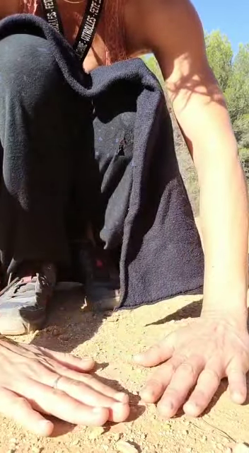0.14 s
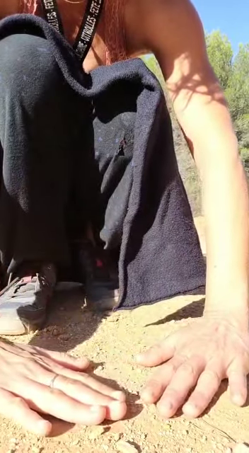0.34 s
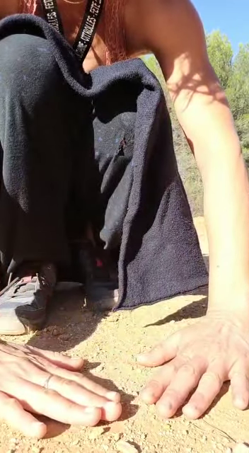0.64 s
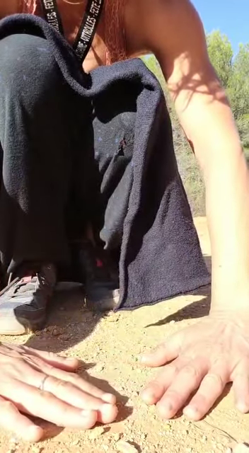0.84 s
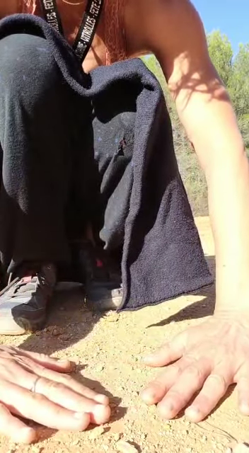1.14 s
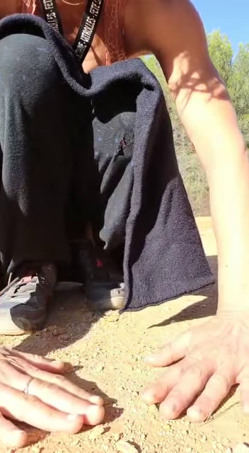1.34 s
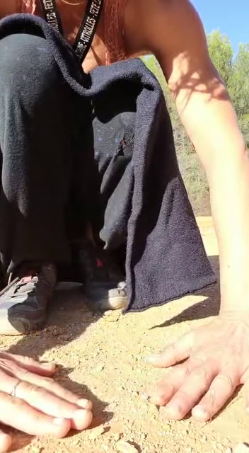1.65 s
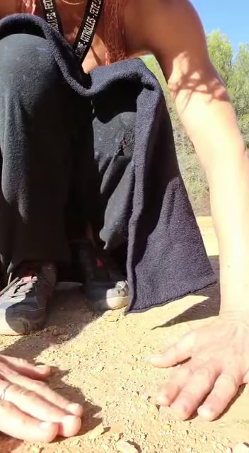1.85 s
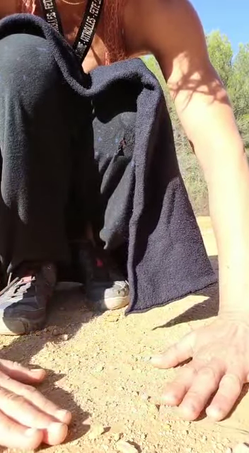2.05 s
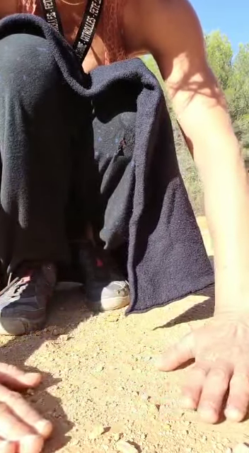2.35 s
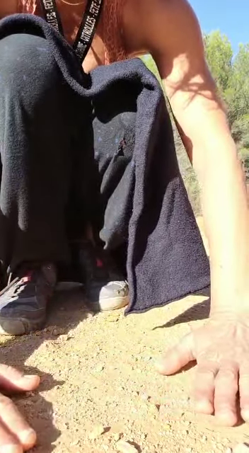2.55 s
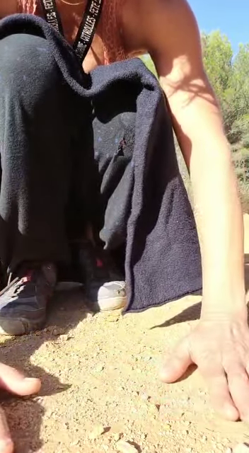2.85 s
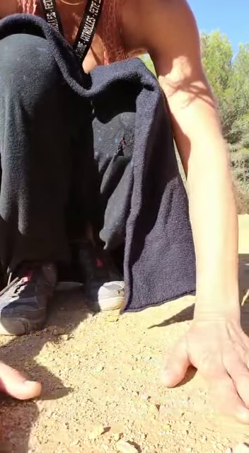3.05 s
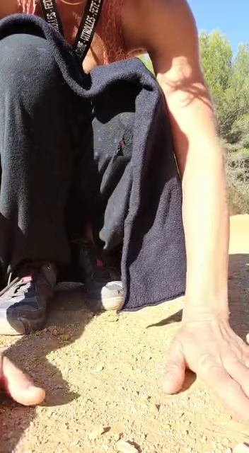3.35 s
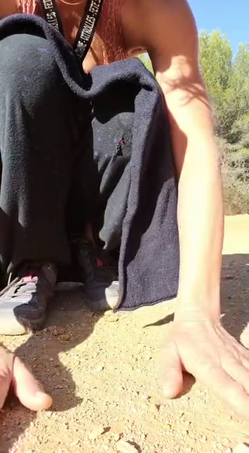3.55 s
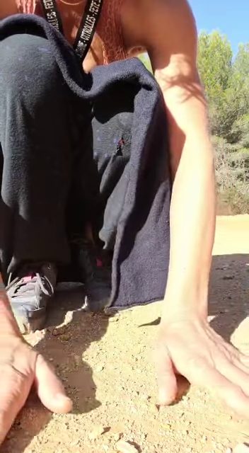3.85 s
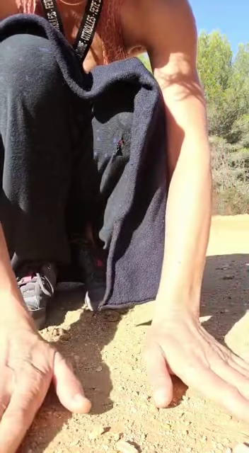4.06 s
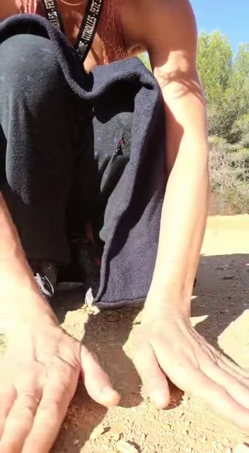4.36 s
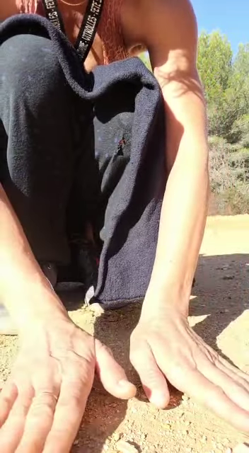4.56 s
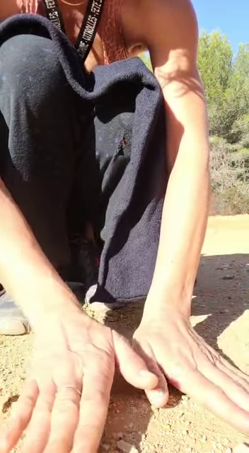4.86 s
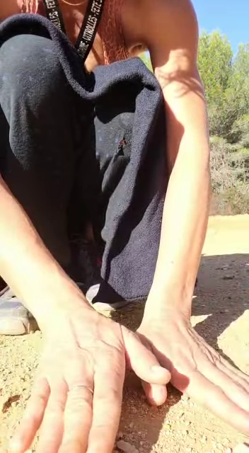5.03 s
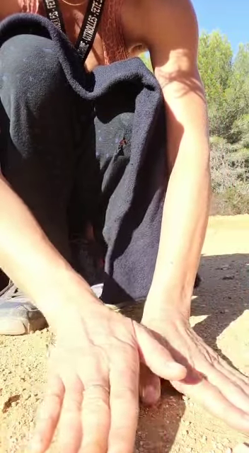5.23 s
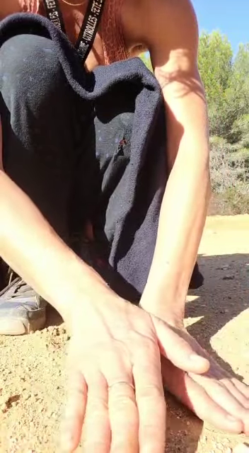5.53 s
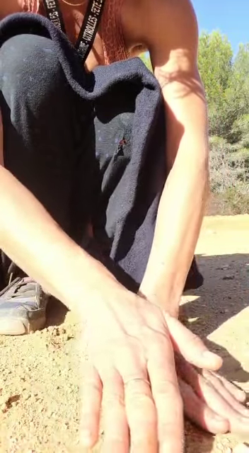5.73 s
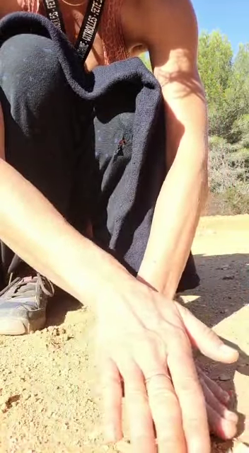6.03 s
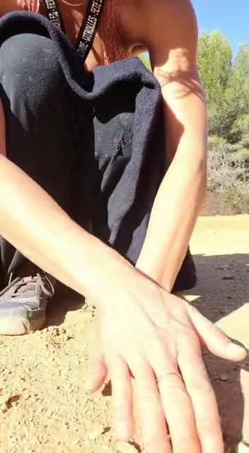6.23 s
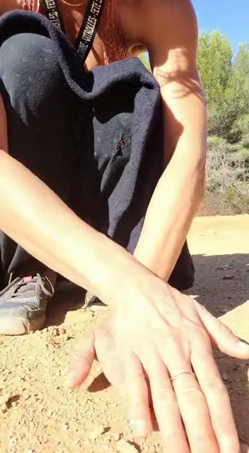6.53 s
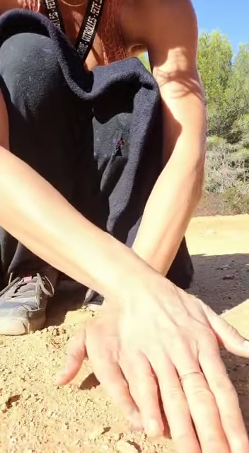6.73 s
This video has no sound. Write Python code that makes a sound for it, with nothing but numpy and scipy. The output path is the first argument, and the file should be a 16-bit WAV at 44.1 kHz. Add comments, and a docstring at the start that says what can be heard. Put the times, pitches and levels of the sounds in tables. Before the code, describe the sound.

Bare palms slide slowly over dry gravelly soil, grit crunching and small stones clicking, with soft low wind buffeting the microphone.

```python
"""On dry gravelly soil, just in front of a phone lying on the ground, two palms slide slowly.
Grit crunches as swarms of damped sines that stick and slip together; stones ring and thud;
grains crack with a bright fizz, and the heel of a palm thumps. Wind is coloured noise: soft
buffets, a low drone and a far hiss. The two ports filter all but the buffets, and the right
one mostly hears the ground first."""
import sys
import numpy as np
from scipy import signal
from scipy.fft import rfft, irfft, next_fast_len
from scipy.io import wavfile
from scipy.ndimage import uniform_filter1d, map_coordinates

SR = 44100
rng = np.random.default_rng(int(sys.argv[2]) if len(sys.argv) > 2 else 0)


def generate_wav(sig):
    """Save sig (samples, or channels by samples) to the path in sys.argv[1] as 16-bit PCM at SR."""
    pcm = np.round(np.clip(np.atleast_2d(sig).T, -1, 1) * 32767).astype(np.int16)
    wavfile.write(sys.argv[1], SR, pcm)


def decibels_to_gain(level_db):
    """Convert a level in decibels to a linear amplitude gain (20 dB per decade)."""
    exponent = np.asarray(level_db, float) / 20
    return 10 ** exponent


N = 303849

# Wind levels before random swaying: start_s, buffet_db, drone_db
WIND_LEVELS = [(0.0, -48, -52.5), (1.15, -47.5, -54.5), (1.48, -44.5, -53.5), (2.01, -49, -54.5),
               (2.09, -44, -53), (2.8, -48, -53.5), (2.99, -47, -48.5), (3.03, -49, -52),
               (3.34, -43, -51.5), (5.05, -47.5, -54), (5.08, -43, -55.5), (5.16, -55, -53),
               (5.31, -43, -54), (5.47, -47.5, -57), (5.82, -43, -52.5), (5.85, -47.5, -56),
               (6.75, -46.5, -53), (6.89, -43.5, -56)]
# Spectral shape of the buffets: frequency_hz, density_db
BUFFET_SPECTRUM = [(8.8, -16), (16, 1.5), (30, -5), (70, -17), (120, -23.5), (160, -36), (260, -120)]
# Spectral shape of the drone ahead of the ports: frequency_hz, density_db
DRONE_SPECTRUM = [(41, -31), (70, -10), (156, -2), (220, -2.5), (312, -5.5), (404, -10.5), (646, -32),
                  (900, -23), (1170, -77), (1980, -120)]
# Left-right correlation of the drone ahead of the ports: frequency_hz, likeness (0-1)
DRONE_LIKENESS = [(60, .985), (130, .98), (200, .92), (290, .72), (500, .2), (900, .1)]
# Far hiss ahead of the ports, against white noise of rms 1: frequency_hz, level_db
AIR_SPECTRUM = [(200, -90), (600, -53), (1400, -57.5), (2000, -59.5), (2500, -57.5), (3200, -60),
                (4500, -56), (6600, -54), (8500, -56.5), (14000, -52)]
# Peaks and notches of the two microphone ports: frequency_hz, left_db, right_db
PORT_RESPONSE = [(80, 0, 0), (200, -2.5, 0), (400, -5, 0), (900, -14.5, -3.5), (1450, -6.5, 0),
                 (1640, -9, -.5), (1820, -4, 0), (1990, -10, 1), (2250, -18.5, -12), (2450, -17, -12.5),
                 (2800, -20.5, -14.5), (3200, -17.5, -11), (3650, -18, -14.5), (4200, -20.5, -21.5),
                 (5150, -15, -12), (5450, -17.5, -11), (5950, -33, -35), (6200, -33, -36),
                 (6550, -18.5, -14), (7000, -20.5, -20.5), (7900, -31, -31), (8900, -31, -28),
                 (9300, -39, -34), (9750, -42, -38), (10050, -35, -27), (11000, -49, -42.5),
                 (11700, -55, -53.5), (12500, -56, -55.5), (13900, -38.5, -33), (14400, -48.5, -43),
                 (15100, -41, -37.5), (16200, -58, -56)]
# Mean delay of the left port behind the right for the hands: start_s, lag_s
PORT_LAG = [(0, 0.00038), (3.5, 0.00045), (4.6, 0.000471), (6.89, 0.00061)]

# Palm heel bumping the ground, ahead of filtering: start_s, level_db, pitch_hz
THUMP_EVENTS = [(2.831, -35, 280), (2.902, -35, 190), (2.912, -35, 200), (2.925, -31, 140),
                (2.987, -27.5, 230), (3.148, -36, 300)]
# Larger grains that crack, nominal, ahead of the ports: start_s, level_db, pitch_hz, fizz_over_snap_db
CRACK_EVENTS = [(0.1739, -39, 5380, 17), (0.3748, -34, 3170, 18.5), (0.4971, -42.5, 2760, 20),
                (0.5424, -35.5, 3180, 18), (0.6037, -39.5, 3040, 10), (0.77, -43, 2845, 17),
                (1.0503, -34, 5700, 10), (1.3583, -38, 5500, 7), (1.3762, -22.5, 5630, 3),
                (1.6141, -32, 3300, 14), (1.8278, -36, 5400, -4), (1.8384, -38, 5200, -4),
                (1.9038, -50, 3200, 1), (1.918, -37, 2960, 4), (1.924, -32, 5300, 4), (1.936, -36, 5300, 1),
                (1.942, -32, 4120, 4), (1.954, -32, 5300, 2), (1.9689, -25, 5200, 13), (2.02, -40, 5300, 1),
                (2.0442, -30, 3030, 6), (2.0851, -19.5, 5400, 8), (2.094, -37, 4800, 4),
                (2.1232, -22.5, 4940, 8), (2.266, -31, 5300, 4), (2.2731, -27, 5640, 4),
                (2.333, -30, 3350, 9), (2.3463, -24.5, 5700, 2), (2.4461, -22.5, 5030, 13),
                (2.5164, -30, 4990, -2), (2.5444, -35, 5050, 0), (2.562, -45, 5100, 4),
                (2.594, -29, 5500, 8), (2.619, -30.5, 5000, 18), (2.647, -47, 5000, 2),
                (2.691, -39, 5000, 16), (2.7187, -25, 5440, 4), (2.724, -27.5, 2800, 16.5),
                (2.741, -35, 3300, 18), (2.7804, -20, 4950, 14), (2.831, -22.5, 3220, 12),
                (2.8514, -31, 3160, 17), (2.865, -44, 5300, 6), (2.8817, -38, 3210, 5),
                (2.9022, -24.5, 3560, 12), (2.914, -25.5, 3500, 13), (2.9247, -23, 3630, 11),
                (2.9888, -19, 3430, 11.5), (3.002, -33, 3400, 12), (3.2838, -36.5, 2920, 13),
                (3.312, -36, 3050, 20), (3.5679, -39, 3300, 1), (3.7266, -32, 3000, 12.5),
                (3.7684, -39, 3000, 20), (3.8185, -34, 5350, 2), (3.9181, -37, 2950, 21),
                (4.0374, -31.5, 3370, 13), (4.241, -26.5, 5500, 8), (4.413, -34, 5430, 11),
                (4.4653, -25, 6000, 3), (4.4881, -27, 5540, 6), (4.5377, -32, 5370, 13),
                (4.5599, -20, 5950, 7), (4.6954, -39, 5140, 20), (4.8597, -35, 5640, -15),
                (5.178, -44.5, 5540, -3), (5.468, -54, 5400, 31), (5.7406, -39.5, 2840, 18),
                (5.8362, -19, 5730, 1), (5.871, -30, 3740, 12), (5.9057, -44, 5340, 4),
                (6.0108, -19.5, 5300, 1), (6.0888, -27, 4100, 6), (6.1105, -31, 5800, -3),
                (6.131, -47, 5300, 4), (6.168, -50, 5280, 2), (6.191, -38, 3950, 8), (6.1985, -24, 4290, 9),
                (6.3353, -36.5, 3670, 11), (6.4923, -40, 3360, 18), (6.5261, -42, 3650, 25),
                (6.6361, -29.5, 3090, 17)]
# Larger stones that roll over, nominal, ahead of the ports: start_s, level_db, pitch_hz, thud_over_ring_db
STONE_EVENTS = [(0.038, -34, 2020, -13), (0.116, -38, 1980, 6), (0.145, -39.5, 1540, -8),
                (0.175, -37, 1100, -3), (0.198, -37, 1940, -18), (0.247, -46, 1860, 1),
                (0.291, -54, 1900, -15), (0.35, -38, 1900, 2.5), (0.374, -39, 1720, -1),
                (0.388, -29.5, 1140, -12), (0.42, -43, 1380, -4), (0.499, -32.5, 1960, -12),
                (0.501, -34, 1250, -19), (0.542, -30.5, 1720, -5.5), (0.547, -33.5, 1900, -2),
                (0.605, -35.5, 1190, -18), (0.728, -40, 1940, 0), (0.742, -35, 1170, -13),
                (0.77, -33, 1230, -29), (0.789, -31, 1114, -30), (0.806, -36, 1700, -7),
                (0.934, -33.5, 1010, -17), (1.036, -34.5, 1160, -5), (1.068, -51, 1290, -15),
                (1.096, -38.5, 1110, -6), (1.13, -57, 1200, -14), (1.208, -38.5, 800, 1),
                (1.237, -38, 1130, -3.5), (1.359, -44.5, 1900, 4), (1.411, -41, 2000, -14),
                (1.435, -43, 1830, -12), (1.512, -33.5, 1030, -22), (1.539, -39, 1000, -20),
                (1.636, -38, 1820, -16), (1.92, -37, 2100, -12), (1.943, -30, 1040, -29),
                (1.969, -28, 2030, -26), (2.018, -42, 923, -16), (2.046, -42, 1800, -11),
                (2.076, -38, 2040, -25), (2.095, -42, 1800, -20), (2.125, -40, 2000, -17),
                (2.193, -36, 1090, -11), (2.21, -34, 1110, -13), (2.235, -36, 1640, -16),
                (2.423, -33.5, 1070, -25), (2.445, -35, 1880, -22), (2.455, -31.5, 2080, -24),
                (2.56, -33, 1380, -24), (2.609, -26.5, 1920, -22), (2.637, -41, 1850, -20),
                (2.665, -53, 1930, -20), (2.689, -36, 1900, -20), (2.703, -31, 1880, -20),
                (2.718, -36, 1920, -24), (2.726, -31, 2000, -15), (2.741, -37, 2000, -18),
                (2.77, -39, 2000, -20), (2.782, -28, 1960, -25), (2.81, -28.5, 1960, -17),
                (2.831, -29, 2000, -20), (2.851, -39, 1930, -16), (2.882, -43, 1880, -20),
                (2.902, -49, 1850, -15), (2.913, -40, 1860, -22), (2.926, -39, 1900, -15),
                (2.975, -34, 1870, -21), (2.986, -26, 1970, -23), (3.002, -44, 1910, -22),
                (3.136, -34, 2220, -9), (3.268, -41, 2080, -14), (3.287, -34, 2220, -20),
                (3.304, -40, 1500, -20), (3.312, -42, 1890, -23), (3.506, -39, 2000, -20),
                (3.729, -32.5, 2040, -26), (3.756, -34, 1980, -19), (3.87, -32, 2100, -13),
                (3.918, -25, 1950, -18), (4.039, -42, 2000, -1), (4.17, -36, 1980, -13),
                (4.242, -41.5, 1910, -14), (4.316, -41, 1840, -7), (4.386, -41, 1890, -19),
                (4.398, -37.5, 1830, -32), (4.448, -35.5, 1850, -25), (4.536, -32, 1830, -19),
                (4.562, -29, 1860, -24), (4.695, -35.5, 1950, -2), (4.715, -35.5, 2020, -24),
                (4.765, -44, 1960, -20), (4.807, -44, 1870, -17), (4.835, -55, 1890, -20),
                (4.86, -42, 1230, -14), (4.903, -47, 1850, -25), (5.125, -50, 1500, -25),
                (5.285, -52.5, 1930, -25), (5.405, -50, 1900, -25), (5.427, -53, 1900, -25),
                (5.468, -39.5, 1970, -32), (5.742, -40, 1290, -21), (5.765, -43, 1950, -19),
                (5.788, -45, 1680, -25), (5.809, -53, 1780, -25), (5.821, -44, 1870, -27),
                (5.838, -32, 1800, -30), (5.845, -32, 1720, -22), (5.867, -40, 1330, -31),
                (5.905, -37.5, 1920, -26), (5.943, -33, 1360, -20), (5.958, -44, 1400, -22),
                (6.011, -33.5, 1630, -5), (6.02, -34, 1140, -12), (6.063, -30, 1060, -30),
                (6.089, -44, 1730, -20), (6.11, -53, 1860, -20), (6.14, -51, 1925, -17),
                (6.192, -38, 1374, -22), (6.201, -34, 1460, -19), (6.241, -43, 1270, -20),
                (6.41, -46, 1340, -19), (6.44, -43, 1430, -19), (6.493, -38.5, 1670, -30),
                (6.46, -45, 1310, -20), (6.527, -30.5, 1590, -9), (6.534, -33, 1610, -15),
                (6.544, -36, 1574, -1), (6.564, -33, 1600, -12), (6.579, -42, 1790, -14),
                (6.606, -34, 974, -15), (6.613, -33, 1760, -14), (6.637, -29, 1630, -27),
                (6.657, -37, 1700, -18.5), (6.675, -47, 1510, -15), (6.703, -37.5, 2030, -14),
                (6.821, -48.5, 1900, -14), (6.871, -45, 1680, -24)]
# Sliding palms, levels before the surge: start_s, crunch_db, grind_db (coarse), sand_db (fine), hollow_hz
PALM_STROKE = [(0.0, -57.5, -57, -74.5, 1730), (0.22, -57, -59.5, -77, 1730), (0.36, -58, -60.5, -75, 1670),
               (0.45, -65.5, -64, -79, 1310), (0.7, -68.5, -63, -81.5, 1380), (1.0, -64, -72, -86.5, 1170),
               (1.12, -57, -82, -74.5, 1140), (1.2, -53.5, -66, -73, 1200), (1.32, -62, -77, -76.5, 1300),
               (1.38, -59.5, -69, -66, 1700), (1.52, -59, -75, -67.5, 1050), (1.6, -52, -60, -64, 1510),
               (1.74, -64, -73, -69, 1160), (1.83, -55.5, -65.5, -62.5, 1610),
               (1.98, -60, -60.5, -65, 1460), (2.08, -52, -71, -61, 1150), (2.22, -56, -59, -65, 1200),
               (2.36, -62.5, -62.5, -67, 1640), (2.44, -55.5, -55.5, -62.5, 1820),
               (2.6, -57.5, -65, -66.5, 1850), (2.76, -57.5, -64, -67, 1940), (2.98, -59, -63, -72, 1760),
               (3.04, -58.5, -59.5, -77.5, 1940), (3.24, -56, -54.5, -76, 1960),
               (3.32, -50.5, -56, -71.5, 1820), (3.5, -53, -54.5, -70, 1600), (3.85, -53, -51, -68, 1870),
               (3.95, -47, -48, -67.5, 2200), (4.12, -54.5, -52.5, -71.5, 1960),
               (4.25, -62.5, -54.5, -73, 1680), (4.44, -54.5, -62, -69.5, 1660),
               (4.55, -67.5, -58, -70, 1810), (4.82, -64.5, -58.5, -71, 1740),
               (4.92, -85.5, -67.5, -82, 1410), (5.34, -89.5, -72, -88.5, 1490),
               (5.48, -61.5, -78, -75, 1870), (5.6, -68, -83, -77, 1320), (5.78, -63, -85, -76, 1380),
               (5.84, -50.5, -77, -60, 1600), (5.9, -52.5, -81, -66, 1260), (5.995, -59, -62, -67.5, 1420),
               (6.015, -49, -63, -62.5, 1300), (6.045, -54, -54, -68, 1150), (6.07, -48.5, -61, -63, 1160),
               (6.14, -60.5, -71, -69, 1370), (6.3, -73.5, -64, -73, 1510), (6.42, -63.5, -79, -77, 1270),
               (6.5, -59.5, -70, -78, 1310), (6.6, -58, -56, -80.5, 1160), (6.66, -53, -56, -78, 1200),
               (6.74, -74, -75, -82.5, 1750), (6.89, -74, -62.5, -83, 1590)]
# Soil under the palms: start_s, rasp_over_blend_db, dust_over_blend_db, jerkiness (0-1.5)
SOIL_TEXTURE = [(0, -0.5, -15.5, 1.09), (1.2, -3.5, -13.5, 1.1), (1.5, -4.5, -26, 1.1),
                (2.4, -1, -22.5, 1.1), (2.95, 3, -14.5, 1.09), (3.15, 8, -12.5, .45), (4.1, 3, -15.5, .45),
                (4.4, -2, -25, .9), (5.5, -18, -29, .9), (5.9, -1.5, -10, 1.1), (6.3, -4.5, -23, 1.1),
                (6.89, 4.5, -11, 1.1)]

RASP_SAND, DUST_SAND = 0.92, 0.52  # share of sand in the blends: rasp of crunch and sand, dust of grind and sand
SURGE_DB, SWAY_DB = 1.1, 4  # scales of the uneven push (per jerkiness) and of the left-right sway
RING_DECAY_S = 0.0013  # nominal time for a stone's ring to fall to 1/e
CREEP, ROLL_KICK = 0.7, 2.2  # steady creep between slips; slip set off by a tabled stone or crack
SLIP_DECAY_S, SLIP_SMOOTH_S = 0.007, 0.005  # fall of a slip to 1/e; span over which it is averaged


def unit(x):
    """Normalization: divides a signal by its root mean square."""
    return x / np.sqrt(np.mean(x ** 2) + 1e-20)


def along(points, hz):
    """Logarithmic frequency scale: interpolates each value column of a spectrum."""
    f, *cols = np.transpose(points)
    return np.array([np.interp(np.log(hz + 1), np.log(f + 1), c) for c in cols])


def curves(rows):
    """Piecewise-linear envelopes: one value per sample for each column after the time."""
    s, *cols = np.transpose(rows)
    return [np.interp(np.arange(N) / SR, s, c) for c in cols]


def wobble(rate):
    """Slow random fluctuation: a smooth curve through rate random knots a second."""
    knots = rng.standard_normal(int(N * rate / SR) + 4)
    return map_coordinates(knots, [np.arange(N) * rate / SR])


def sides(pan_db):
    """Interaural-style level difference: splits a left-right difference into two gains."""
    return decibels_to_gain(np.array([pan_db / 2, -pan_db / 2]))


def ported(pair):
    """Linear filtering: each channel passes the causal minimum-phase response of its port."""
    size = 4096
    log_gain = np.log(decibels_to_gain(along(PORT_RESPONSE, np.fft.rfftfreq(size, 1 / SR))))
    # folding the cepstrum onto positive time gives minimum phase
    cepstrum = irfft(log_gain, size)
    cepstrum[:, 1:size // 2] *= 2
    cepstrum[:, size // 2 + 1:] = 0
    response = irfft(np.exp(rfft(cepstrum)), size)[:, :size // 4]
    return signal.oaconvolve(pair, response, axes=-1)[:, :N]


def above(x, edge_hz):
    """Steep high-pass: the grains carry little energy far below their own pitch."""
    return signal.sosfilt(signal.butter(4, edge_hz, "high", fs=SR, output="sos"), x)


def rush(spectrum, alike):
    """Partial coherence: coloured mid and side noises mix to a given left-right likeness."""
    size = next_fast_len(N)
    hz = np.fft.rfftfreq(size, 1 / SR)
    angle = np.arccos(np.clip(along(alike, hz)[0], -1, 1)) / 2
    coloured = rfft(rng.standard_normal((2, size))) * decibels_to_gain(along(spectrum, hz))
    mid, side = irfft(coloured * [np.cos(angle), np.sin(angle)], size)
    return np.array([mid + side, mid - side])[:, :N]


def wind():
    """Turbulent pressure: buffets nearly alike on both sides, with a low drone and a far hiss."""
    buffet_db, drone_db = curves(WIND_LEVELS)
    buffet = unit(rush(BUFFET_SPECTRUM, [(30, 0.985)]))
    buffet = decibels_to_gain(buffet_db + 1.55 * wobble(4.2)) * buffet
    drone = unit(ported(rush(DRONE_SPECTRUM, DRONE_LIKENESS)))
    drone = decibels_to_gain(drone_db + 1.1 * wobble(4.75)) * drone
    air = ported(rush(AIR_SPECTRUM, [(1000, 0.022)]))
    return buffet + drone + air


def grains(s, hz, cycles, gains, spread_s, size=160, phase_rad=None):
    """Impulsively excited damped oscillation: the contact spot wanders, and with it the port lag."""
    phase, spot = rng.uniform(0, 2 * np.pi, len(s)), 1.52 * rng.standard_normal(len(s))
    if phase_rad is not None:
        phase = np.full(len(s), phase_rad)
    first = np.floor(s * SR).astype(int)
    wander = spot + wobble(11)[np.clip(first, 0, N - 1)]
    lag = np.interp(s, *np.transpose(PORT_LAG)) + spread_s * wander
    start = first[:, None] + np.arange(size)
    out = []
    # only the left port is late
    for gain, late in zip(gains, (np.maximum(lag, 0), 0 * lag)):
        turns = np.maximum(start / SR - (s + late)[:, None], 0) * hz[:, None]
        onset = -np.expm1(-turns / 0.038)
        decay = np.exp(-turns / np.reshape(cycles, (-1, 1)))
        shape = np.sin(2 * np.pi * turns + phase[:, None]) * decay * onset
        out.append(np.bincount(start.ravel(), (gain[:, None] * shape).ravel(), N + size)[:N])
    return np.array(out)


def thumps():
    """Heavily damped oscillation: the heel of a palm gives a soft low push of about one cycle."""
    s, db, hz = np.transpose(THUMP_EVENTS)
    push = grains(s, hz, 0.81, decibels_to_gain(np.array([db, db])), spread_s=0.00002, size=900, phase_rad=np.pi)
    soft = signal.sosfilt(signal.butter(2, 900, fs=SR, output="sos"), push)
    return ported(soft)


def contacts(table, bed_db, pitch_hz, over_db, spiky_db, scatter, second_db, count):
    """Random point process: adds small contacts, likelier where the bed is loud, and pans them all."""
    draw = rng.random((count, 2))
    colour = rng.standard_normal((count, 2))
    chance = np.cumsum(decibels_to_gain(0.6 * bed_db))
    at = np.minimum(np.searchsorted(chance, draw[:, 0] * chance[-1]), N - 1)
    level_db = bed_db[at] + over_db - spiky_db * np.log(1 - draw[:, 1])
    hz = pitch_hz[at] * np.exp(scatter * colour[:, 0])
    small = [at / SR, level_db, hz, second_db + 4 * colour[:, 1]]
    rows = np.vstack([table, np.transpose(small)])
    pan_db = -1.5 + 1.94 * rng.standard_normal(len(rows))
    return np.column_stack([rows, pan_db])


def slips(table, step_s, fall_db, count):
    """Successive release: each contact becomes a quick run of slips that fades (grows if fall_db < 0)."""
    s, db, hz, second_db, pan_db = np.repeat(np.transpose(table), count, axis=1)
    steps = (np.arange(len(s)) % count) * rng.uniform(0.495, 1.35, len(s))
    gains = sides(pan_db) * decibels_to_gain(db - fall_db * steps)
    return s - 0.0006 + step_s * steps, gains, hz, second_db


def cracks():
    """Brittle fracture: short-lived bright snaps, with a fizz of splinters on top."""
    sand_db = curves(PALM_STROKE)[2]
    splits = contacts(CRACK_EVENTS, sand_db, 4000 * np.ones(N), over_db=20.0, spiky_db=2.5,
                      scatter=0.16, second_db=18, count=180)
    s, gains, hz, fizz_db = slips(splits, step_s=0.00037, fall_db=-1.0, count=6)
    spread = np.exp(rng.standard_normal((2, len(s))))
    snap = grains(s, hz * spread[0] ** 0.012, 0.96, gains, spread_s=0.00004)
    fizz_hz = np.minimum(13000 * spread[1] ** 0.1, SR / 2.5)
    fizz = grains(s, fizz_hz, 0.77, gains * decibels_to_gain(fizz_db), spread_s=0.00003)
    return ported(snap + above(fizz, edge_hz=6900))


def stones():
    """Impact resonance: a short ring and a thud in the soil, then crumbs trickle into the hole."""
    crunch_db, _, _, hollow_hz = curves(PALM_STROKE)
    rolls = contacts(STONE_EVENTS, crunch_db, hollow_hz, over_db=3.5, spiky_db=3.34,
                     scatter=0.24, second_db=-23, count=140)
    s, gains, hz, thud_db = slips(rolls, step_s=0.001306, fall_db=4.0, count=3)
    spread = np.exp(rng.standard_normal((2, len(s))))
    ring = grains(s, hz * spread[0] ** 0.055, hz * RING_DECAY_S, gains, spread_s=0.00004,
                  size=300, phase_rad=0)
    thud = grains(s, 330 * spread[1] ** 0.21, 0.83, gains * decibels_to_gain(thud_db), spread_s=0.00004, size=300)
    s, gains, hz, _ = slips(rolls, step_s=0.004, fall_db=2.2, count=7)
    crumb_gain = decibels_to_gain(2.5 * rng.standard_normal(len(s)) - 8)
    crumb_hz = hz * np.exp(0.051 + 0.28 * rng.standard_normal(len(s)))
    crumbs = grains(s, crumb_hz, 1.0, gains * crumb_gain, spread_s=0.00005)
    return ported(ring + thud + crumbs)


def stick_slip(count):
    """Stick-slip friction: fading slips come by chance and with every tabled stone or crack."""
    draw = rng.random((count, 2))
    kicks = np.bincount((draw[:, 0] * N).astype(int), -np.log(1 - draw[:, 1]), N)
    moves = np.array([row[0] for row in STONE_EVENTS + CRACK_EVENTS])
    kicks = kicks + ROLL_KICK * np.bincount((moves * SR).astype(int), minlength=N)
    fading = signal.lfilter([1], [1, -np.exp(-1 / (SLIP_DECAY_S * SR))], kicks)
    return uniform_filter1d(fading, int(SLIP_SMOOTH_S * SR))


def grit(clumps, pitch_hz, scatter, cycles, spiky_db, pan_db, spread_s, count):
    """Granular superposition: many grains slip in clumps, of unequal size, at rms 1 overall."""
    chance = np.cumsum(clumps)
    draw = rng.random((count, 2))
    at = np.minimum(np.searchsorted(chance, draw[:, 0] * chance[-1]), N - 1)
    hz = np.clip(pitch_hz[at] * np.exp(scatter * rng.standard_normal(count)), 150, SR / 2.5)
    size = decibels_to_gain(-spiky_db * np.log(1 - draw[:, 1])) * rng.choice([-1, 1], count)
    swarm = grains(at / SR, hz, cycles, size * sides(pan_db[at]), spread_s)
    return unit(ported(above(swarm, 0.7 * pitch_hz.min())))


def palms():
    """Shared friction: five sizes of soil slip together; the crunch rings in the hollow under the palm."""
    crunch_db, grind_db, sand_db, hollow_hz = curves(PALM_STROKE)
    rasp_over_db, dust_over_db, jerky = curves(SOIL_TEXTURE)
    rasp_db = rasp_over_db + crunch_db + RASP_SAND * (sand_db - crunch_db)
    dust_db = dust_over_db + grind_db + DUST_SAND * (sand_db - grind_db)
    pan_db = SWAY_DB * wobble(13) + 0.5
    surge_db = SURGE_DB * jerky * wobble(13)
    slip = stick_slip(count=200)

    def clumps():
        """Common slips under an independent fluctuation for each grain size."""
        return (CREEP + jerky ** 2 * slip) * decibels_to_gain(1.6 * jerky * wobble(25))

    flat = np.ones(N)
    grind = grit(clumps(), 650 * flat, scatter=0.33, cycles=0.86, spiky_db=-0.6,
                 pan_db=0.067 * pan_db, spread_s=0.0001, count=4500)
    crunch = grit(clumps(), hollow_hz, scatter=0.28, cycles=1.87, spiky_db=-1.5,
                  pan_db=0.28 * pan_db, spread_s=0.00005, count=8000)
    rasp = grit(clumps(), 3700 * flat, scatter=0.28, cycles=3.0, spiky_db=-0.5,
                pan_db=0.25 * pan_db, spread_s=0.00003, count=9000)
    sand = grit(clumps(), 6500 * flat, scatter=0.3, cycles=0.6, spiky_db=1.5,
                pan_db=pan_db, spread_s=0.00002, count=10000)
    dust = grit(clumps(), 12500 * flat, scatter=0.27, cycles=0.61, spiky_db=3.0,
                pan_db=0.28 * pan_db, spread_s=0.00002, count=9000)
    levels_db = (grind_db, crunch_db, rasp_db, sand_db, dust_db)
    layers = (grind, crunch, rasp, sand, dust)
    return sum(decibels_to_gain(db + surge_db) * layer for db, layer in zip(levels_db, layers))


def scene():
    """Linear superposition: the pressures of all sources add at the two capsules."""
    return wind() + thumps() + cracks() + stones() + palms()


def band_limit(x):
    """A steep low-pass at the top of the band."""
    return signal.sosfilt(signal.butter(12, 16470, fs=SR, output="sos"), x)


def record(dry):
    """Direct capture: the capsule signals are the finished mix, with no further gain."""
    return band_limit(dry)


dry = scene()
out = record(dry)
generate_wav(out)
```